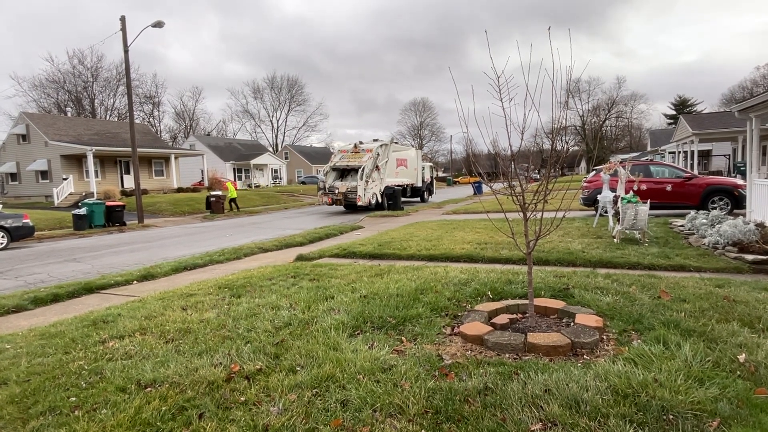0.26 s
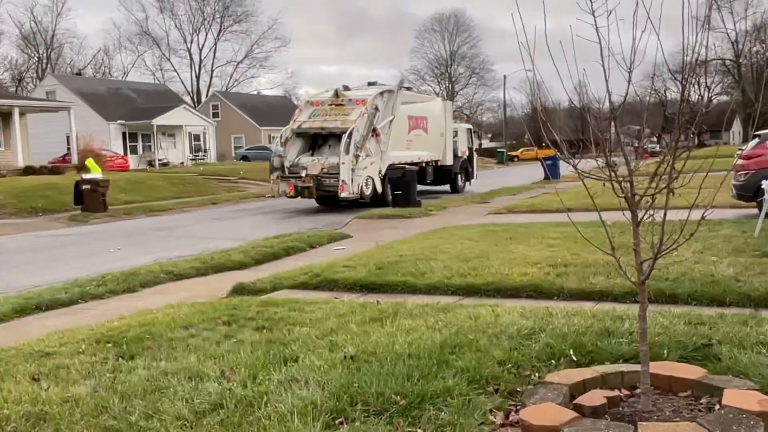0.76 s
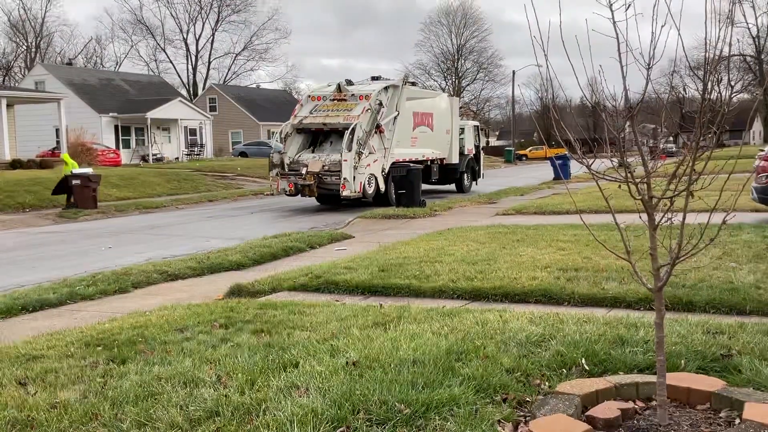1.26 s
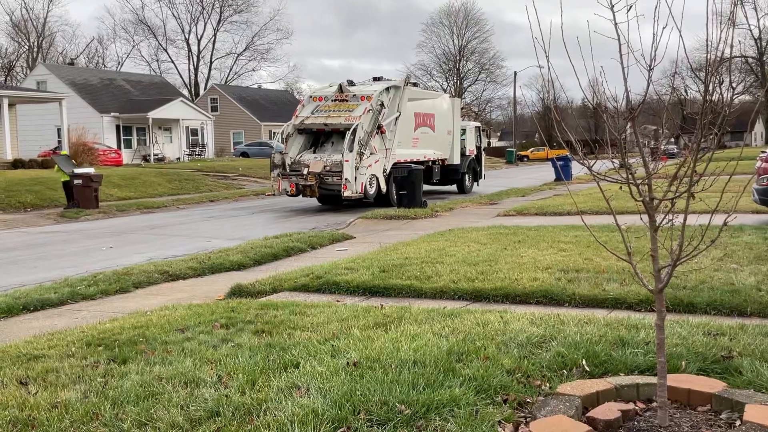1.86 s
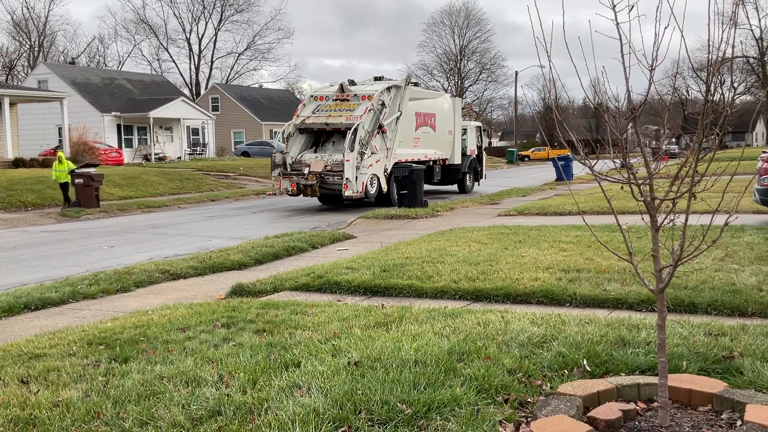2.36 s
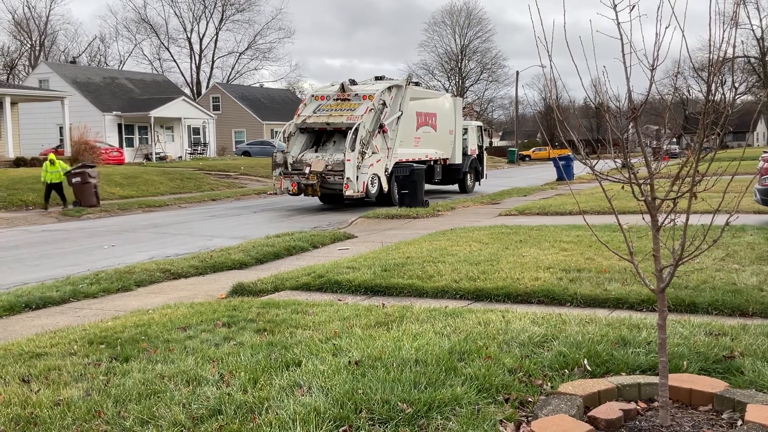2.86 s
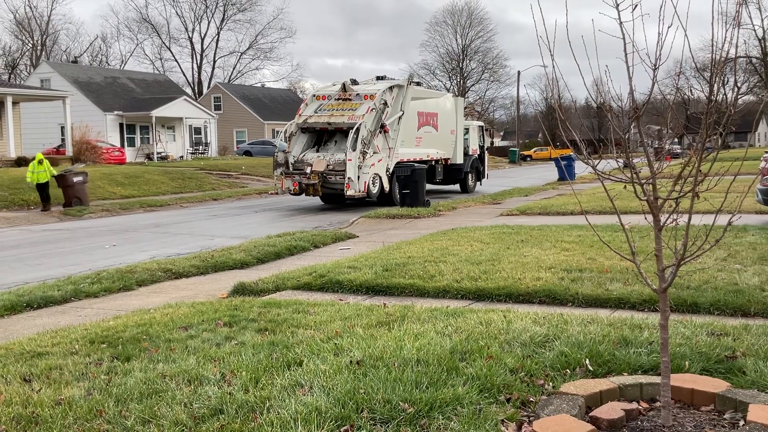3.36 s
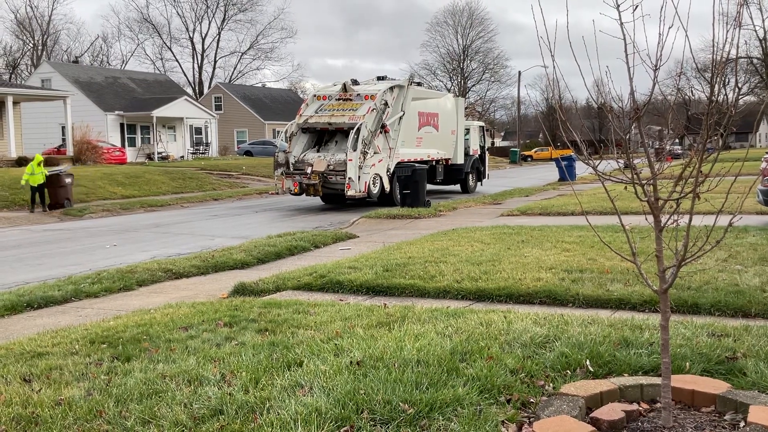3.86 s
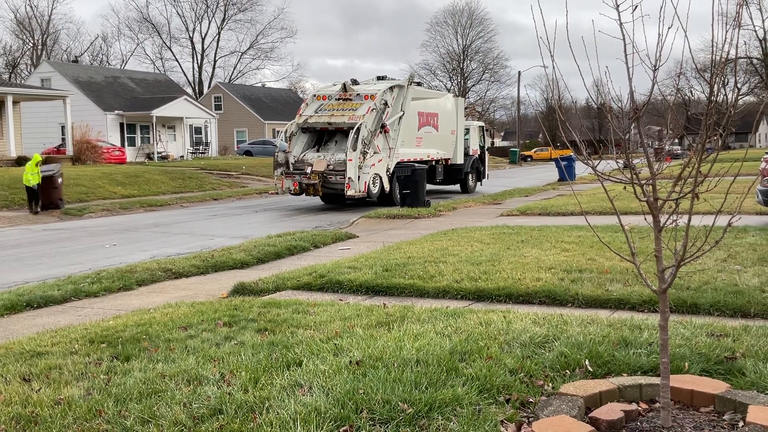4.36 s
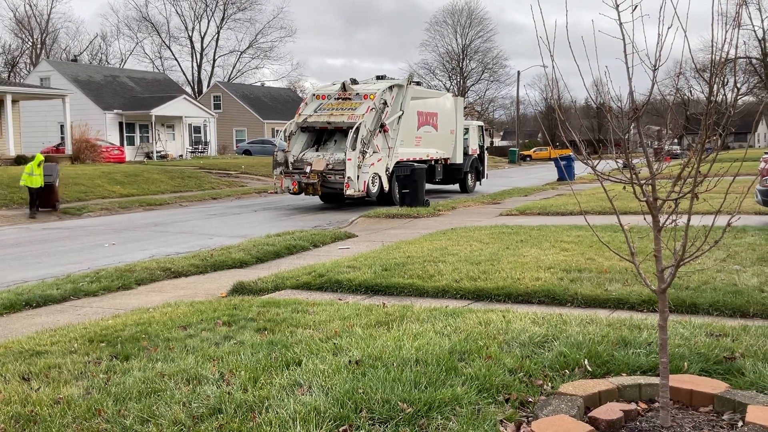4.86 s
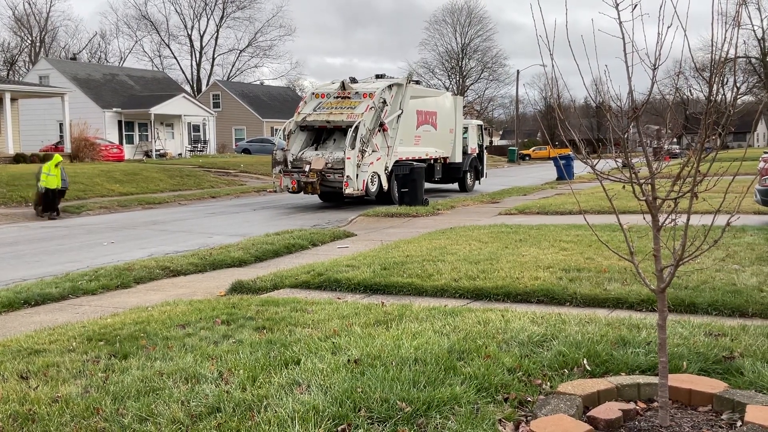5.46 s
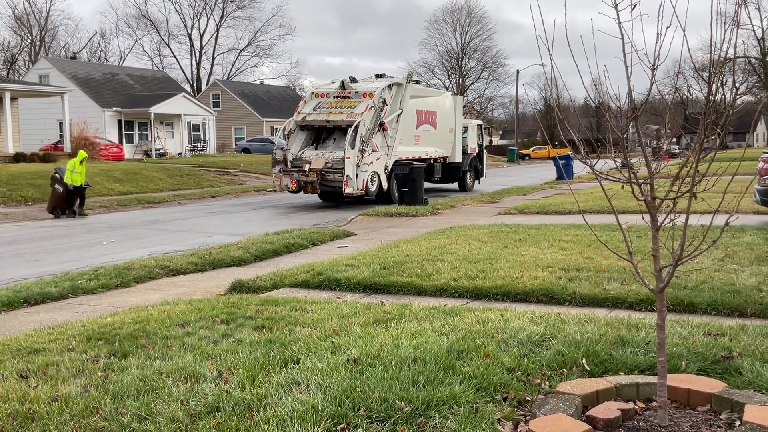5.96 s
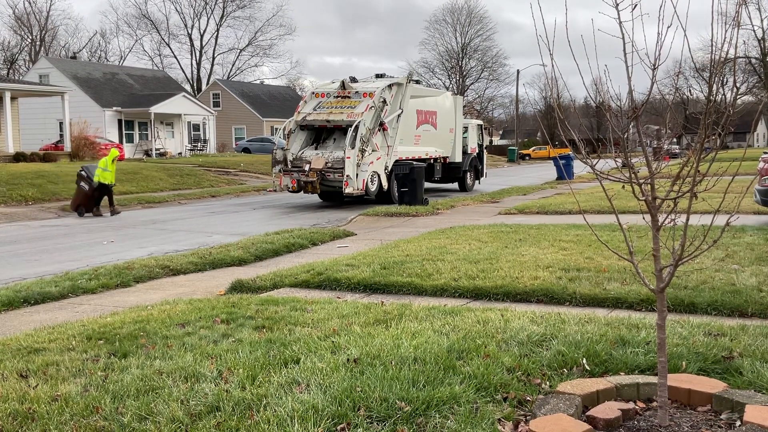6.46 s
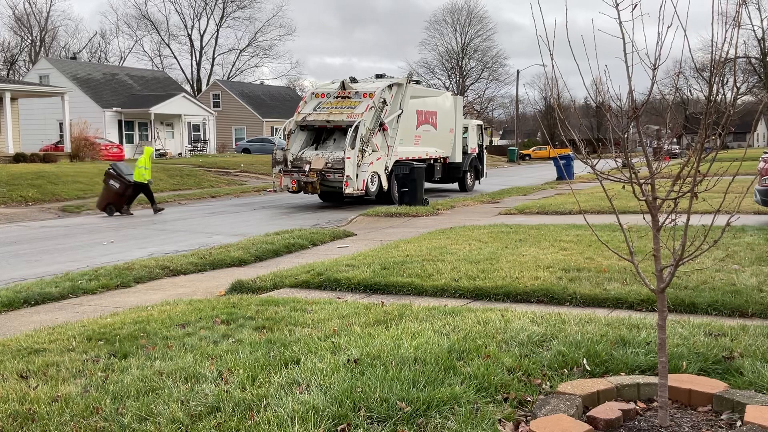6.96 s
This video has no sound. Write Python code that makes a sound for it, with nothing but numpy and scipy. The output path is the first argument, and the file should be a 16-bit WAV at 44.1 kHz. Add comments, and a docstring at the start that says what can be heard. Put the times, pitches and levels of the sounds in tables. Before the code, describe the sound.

Outdoors on a quiet residential street, a garbage truck's diesel idles throughout with low pulsing rumble, pump hum, metallic clatter, hiss and fading thin whines. After about three seconds a hollow plastic wheelie bin knocks and rattles over grass, goes nearly quiet, then bangs off the kerb and rolls over gritty asphalt with booming lurches and sharp stone snaps. Stereo microphone, light open-air scatter.

```python
"""A residential street: a garbage truck idles across the whole scene, heard at two microphone ports.
Engine and pump tones, firing-pulsed noise, a ringing hiss and thin whines make up the truck.
Nearby a plastic wheelie bin bumps over the verge and rolls along the asphalt. Filtered random contacts
make its hollow body boom, its walls rattle and grit crunch; timed bursts make knocks, a lid slap and snaps."""
import sys
import numpy as np
from scipy import signal
from scipy.fft import rfft, irfft, next_fast_len
from scipy.io import wavfile
from scipy.ndimage import uniform_filter1d

SR = 44100
rng = np.random.default_rng(int(sys.argv[2]) if len(sys.argv) > 2 else 0)


def unload_wav(signal):
    """Save mono or channel-first audio to the path in sys.argv[1] as 16-bit WAV at rate SR, clipped to [-1, 1]."""
    wavfile.write(
        sys.argv[1],
        SR,
        np.round(np.clip(np.atleast_2d(signal).T, -1, 1) * 32767).astype(np.int16),
    )


N = 317079
TIME = np.arange(N) / SR  # seconds

CRANK_HZ, PUMP_HZ = 13.34, 119.1  # mean turning rates
CLATTER_DB = -48  # rms
SQUEAL_HZ = 4320
# Engine tones. Each row: multiple of the crank rate (halves are rounded when played), mean level in dB rms.
ENGINE_ORDERS = [(4, -47), (5.5, -51.5), (6, -44), (7.5, -54.5), (8, -50.5), (11, -52), (12, -51.5),
                 (16, -59.5), (17, -61.5), (19, -61.5), (20, -63.5), (26, -69), (28, -58), (30, -62),
                 (37, -70), (64, -67.5), (72, -64)]
# Pump tones. Each row: multiple of the pump rate, level in dB before the pump hum's own curve.
PUMP_ORDERS = [(1, -38.5), (2, -42), (3, -54), (4, -66.5)]
# How the truck changes. Each row: time in seconds, then the gains of pump hum, hiss and whine in dB.
TRUCK_LEVELS = [(0, -1.5, 3, 5), (0.3, 0.5, 1, 4), (0.8, -3.5, 1.5, 3), (1.3, -2, 0.5, 1.5),
                (1.7, -2.5, 0.5, -1), (2.3, -1, 0, -0.5), (2.85, -2, -1.5, -1.5), (3.8, -2.5, -3, -7),
                (5.2, -2.5, -4, -10.5), (7.19, 1, -4, -9.5)]
# Exhaust rumble spectrum. Each row: frequency in Hz, relative level in dB.
RUMBLE_SPECTRUM = [(20, -71), (36, -17), (52, 0), (85, 3), (130, -1.5), (180, -1), (250, -11.5),
                   (300, -13.5), (450, -21.5), (800, -56)]
# Engine block clatter spectrum. Each row: frequency in Hz, relative level in dB.
CLATTER_SPECTRUM = [(250, -25), (480, 2), (680, 3.5), (900, 3), (1280, -1.5), (1650, 0.5), (1830, 6),
                    (2050, -4), (2600, -6), (3500, -6), (6000, -47.5), (11000, -61.5)]
# Ringing hiss spectrum. Each row: frequency in Hz, relative level in dB.
HISS_SPECTRUM = [(1800, -6.5), (2700, 7), (3300, -9.5), (3850, -1.5), (4200, 3.5), (4450, -2), (5200, 0.5),
                 (5800, 1), (6050, -3), (6300, 0.5), (6600, -3), (6900, 3), (7450, -1), (7700, -4.5),
                 (7900, -1), (8200, -9), (8450, -6), (8700, -8.5), (10100, -9.5), (11000, -16),
                 (12500, -59)]
# Thin whines of the running machinery. Each row: frequency in Hz, relative level in dB.
WHINES = [(1828, -61.5), (4635, -70), (4770, -68), (5109, -73), (5211, -75.5), (5286, -73.5), (6282, -71),
          (6465, -74), (6840, -66.5), (7000, -66), (7090, -68.5), (7381, -71), (7430, -68), (7860, -76)]
# One thin squeal with its own swell and fade. Each row: time in seconds, level in dB.
SQUEAL_LEVELS = [(0, -75), (1.0, -64.5), (1.8, -64), (2.2, -61.5), (2.7, -65.5), (3.3, -72), (5.0, -71)]

# The bin is hauled over the lawn, rests, then rolls off the kerb on to the road.
# Each row: time in seconds, relative body boom in dB, relative wall rattle in dB.
ROLL = [(3.25, -36, -49.5), (3.56, -26, -36.5), (3.74, -31, -39.5), (3.81, -34, -44), (3.9, -31.5, -36.5),
        (4.1, -39, -45.5), (4.9, -41.5, -62), (5.25, -23, -45), (5.65, -24, -43), (6.08, -28.5, -43),
        (6.6, -27, -51.5), (6.95, -26, -42.5), (7.19, -30.5, -49)]
# Once it rolls freely the bin lurches on every turn of its wheels.
ROLLING_S, FIRST_LURCH_S, WHEEL_TURN_S = 4.8, 5.275, 0.234
LURCH_BOOM_DB, LURCH_RATTLE_DB = 2, 3  # swing either way
# Ground under the wheels. Each row: start in seconds, crunch level in dB, gain above 7 kHz in dB.
GROUND = [(3.3, -65, 15), (4.4, -63, -1), (5.2, -57, -31), (5.6, -51, 4.5), (6.07, -57.5, 6.5),
          (6.33, -59.5, 6.5), (6.8, -58.5, 9)]
GROUND_BLEND_S = 0.015
STONES_PER_S, STONES_DB = 70, 0.5  # random cracks, level against the grit
CRUNCH_TOP_HZ = 10200
# Hollow body of the bin. Each row: frequency in Hz, relative level in dB.
BODY_SPECTRUM = [(28, -63), (45, -17), (65, -2.5), (90, -4.5), (112, -0.5), (138, 4), (168, -12),
                 (205, -5.5), (260, -15.5), (340, -17.5), (480, -32), (900, -63.5), (4000, -110)]
# Plastic walls of the bin. Each row: frequency in Hz, relative level in dB.
WALL_SPECTRUM = [(90, -24), (250, 17.5), (480, 5.5), (700, 3), (1000, 5), (1280, -0.5), (1520, 0.5),
                 (1750, -19.5), (2400, -6.5), (3400, -17), (7000, -37), (11000, -70)]
# Grit and plastic cracking. Each row: frequency in Hz, relative level in dB.
GRIT_SPECTRUM = [(1000, -22), (2200, 1.5), (2800, 2.5), (3300, 0.5), (4500, -1), (5050, -1), (5550, -6),
                 (6000, -2.5), (6400, -7), (7000, -6.5), (8200, -13), (9900, -14.5), (12000, -21),
                 (13200, -35), (16000, -41)]
# Modes of the plastic walls. Each row: frequency in Hz, relative level in dB.
WALL_MODES = [(620, -8), (1010, -8), (1170, -6.5), (1500, -3), (2720, -11), (3300, 0)]

# Hard knocks of wheels, axle and lid.
# Each row: start in seconds, relative clack peak in dB, wall ring in Hz, body ring in Hz, relative thud peak in dB.
KNOCKS = [(2.456, -36, 617, 130, -28), (3.323, -29.5, 420, 129, -30), (3.359, -33, 410, 236, -26),
          (3.384, -29, 545, 125, -21.5), (3.403, -37, 452, 109, -20.5), (3.446, -27, 460, 183, -28),
          (3.466, -39, 487, 110, -35), (3.503, -21.5, 1450, 113, -36), (3.529, -26, 1430, 127, -26),
          (3.554, -23.5, 724, 107, -26), (3.567, -24, 746, 143, -22), (3.581, -28.5, 1300, 127, -23.5),
          (3.599, -35, 915, 92, -19), (3.619, -26.5, 436, 139, -25.5), (3.637, -25, 564, 139, -33),
          (3.681, -32, 528, 100, -25), (3.714, -32, 600, 234, -29), (3.727, -22.5, 830, 117, -25),
          (3.749, -27, 427, 110, -33), (3.865, -33, 806, 117, -33), (3.882, -21, 1450, 248, -30),
          (3.904, -26, 1360, 96, -19.5), (3.930, -27.5, 820, 183, -26.5), (3.957, -29.5, 842, 139, -36),
          (4.019, -27.5, 820, 131, -47), (4.039, -38, 418, 161, -34), (4.169, -28, 1040, 106, -24),
          (4.256, -33.5, 800, 128, -36), (4.972, -21, 970, 155, -23.5), (5.06, -22.5, 457, 175, -19.5),
          (5.077, -27, 1040, 108, -21), (5.175, -26, 484, 140, -40), (5.215, -28, 430, 140, -14.5),
          (5.256, -20, 446, 129, -18.5), (5.289, -21.5, 696, 222, -34), (5.343, -23.5, 960, 109, -26),
          (5.382, -24.5, 470, 116, -21.5), (5.423, -24, 527, 151, -27), (5.437, -36, 500, 120, -17),
          (5.456, -25.5, 420, 252, -21), (5.473, -25, 1080, 161, -26), (5.498, -21.5, 476, 217, -19),
          (5.519, -24, 546, 134, -23), (5.545, -21, 816, 124, -16.5), (5.573, -18.5, 470, 139, -16.5),
          (5.619, -21.5, 1510, 122, -21), (5.644, -29, 980, 113, -23), (5.710, -20, 450, 204, -15.5),
          (5.734, -29, 479, 210, -16), (5.753, -31, 416, 233, -18.5), (5.772, -31, 420, 136, -15.5),
          (5.870, -30, 960, 155, -31), (5.896, -25.5, 1400, 123, -22), (5.909, -26, 420, 138, -28),
          (5.982, -22, 960, 104, -23), (6.008, -33, 1400, 122, -17), (6.056, -23.5, 506, 129, -25),
          (6.161, -24.5, 533, 107, -15.5), (6.186, -33, 452, 97, -27), (6.224, -32, 1190, 128, -29),
          (6.318, -32, 1270, 99, -31), (6.442, -32.5, 800, 117, -12), (6.627, -35, 1040, 208, -22),
          (6.845, -31.5, 493, 113, -20), (6.880, -27, 497, 118, -19.5), (6.934, -36, 939, 145, -37),
          (6.963, -23, 505, 104, -14), (7.160, -31, 840, 118, -29)]
REBOUNDS_PER_S = 3000  # loose parts chatter after each blow
LAWN_CHATTER_S, ROAD_CHATTER_S = 0.0098, 0.0062  # chatter decays; longer over the lawn
# Modes of the lid. Each row: frequency in Hz, relative level in dB, time to fall 60 dB in seconds.
LID_MODES = [(301, -17, 0.047), (1025, -28.5, 0.072), (1502, -21.5, 0.047), (2720, -36, 0.062),
             (3520, -37, 0.035)]
LID_S, LID_DB = 5.2885, -16  # start, peak level
# Loud snaps of grit and plastic.
# Each row: start in seconds, relative peak in dB, ring in Hz, gain above 7 kHz in dB.
SNAPS = [(1.512, -22.5, 4170, -1.5), (3.322, -25.5, 3630, 15), (3.5038, -31, 3000, 15),
         (3.683, -30.5, 3120, 2), (3.7638, -16.5, 3140, 5), (3.819, -24, 3250, 9), (4.167, -36, 4040, 13),
         (4.282, -34.5, 3300, -3), (4.3943, -34, 3260, 12), (4.843, -32, 2800, 5), (5.249, -26, 3280, -14),
         (5.2872, -26.5, 3120, 1), (5.621, -34, 3500, -5), (5.728, -28, 2960, -14),
         (5.5796, -21, 3580, -10), (5.634, -35, 5500, 4), (5.674, -26.5, 3300, 11), (5.739, -15, 3430, 11),
         (5.762, -18, 3450, 14), (5.843, -28.5, 3290, 16), (5.855, -31, 4210, 8), (5.899, -36, 4610, 3),
         (5.9826, -10, 5700, 9.5), (6.013, -29, 7000, 7), (6.1388, -22, 3370, 3), (6.1953, -26, 6100, 12),
         (6.2208, -30.5, 3330, 6), (6.274, -32, 5300, 7), (6.453, -25, 3100, 17), (6.491, -31, 3480, 9),
         (6.5002, -22.5, 3330, 10.5), (6.532, -44, 4400, 13), (6.6406, -29, 3070, -5),
         (6.6803, -20.5, 3050, 14), (6.751, -36.5, 3340, 2), (6.769, -35, 4600, 11), (6.806, -35, 3120, 18),
         (6.872, -35, 3120, 13), (6.84, -28, 4770, 20), (6.892, -31, 3150, 8), (6.9325, -23, 3120, 15),
         (6.956, -35.5, 4500, 12), (7.034, -32, 6000, 2), (7.0494, -36, 3170, -0.5),
         (7.145, -32.5, 4400, 8), (7.16, -29, 3130, 4)]
SLIP_DECAY_S, CRACK_DECAY_S = 0.0045, 0.0014
CRUMBS_PER_S, CRUMBS_DB, CRUMB_DECAY_S = 2500, -10.5, 0.02

# Phase between the ports for the truck's direction. Each row: frequency in Hz, lead of the left port in radians.
TRUCK_PHASE = [(0, 0), (600, -0.9), (860, -0.5), (1210, -0.5), (2070, 2.6), (2580, 3.4), (3100, 5.6),
               (3530, 6.1), (6030, 6.7), (7840, 7.3), (8100, 7.3), (10300, 8.2), (11100, 9.3), (12700, 9.5)]
# Phase between the ports for the bin's direction. Each row: frequency in Hz, lead of the left port in radians.
BIN_PHASE = [(0, 0), (430, 0.1), (690, -0.4), (1290, -0.1), (2070, 2.7), (2580, 3.5), (3100, 5.6),
             (3530, 6.2), (8350, 7.4), (9910, 7.9), (10900, 8.6), (12700, 8.9)]
# Colour of the right port against the left. Each row: frequency in Hz, gain in dB.
RIGHT_PORT = [(100, 0.2), (300, 0.6), (700, 1.1), (1700, 1.0), (2600, -0.2), (5000, -0.5), (8000, 0)]
SCATTER_DB = -7.5  # street scatter before its low-pass and high-pass
CUTOFF_HZ = 16000


def from_db(db):
    """Decibels to gain."""
    return 10 ** (np.asarray(db) / 20)


def rms_one(x):
    """Scale to unit rms."""
    return x / np.sqrt(np.mean(x ** 2) + 1e-20)


def in_time(rows):
    """One curve over time for each level column of a table."""
    s, *columns = np.transpose(rows)
    return [np.interp(TIME, s, column) for column in columns]


def drift(rate_hz):
    """Slow random wander of unit rms: noise through a double pole at the given rate."""
    step = 40  # samples between points of the wander
    r = np.exp(-2 * np.pi * rate_hz * step / SR)
    noise = rng.standard_normal(N // step + 4002)
    slow = signal.lfilter([1], [1, -2 * r, r * r], noise)[4000:]  # skip the filter's start
    return np.interp(np.arange(N) / step, np.arange(len(slow)), rms_one(slow))


def colour(x, spectrum):
    """Causal (minimum-phase) filter with the given spectrum, built by folding its cepstrum."""
    length = x.shape[-1]
    size = 2 * next_fast_len(length // 2 + SR // 8)
    hz, db = np.transpose(spectrum)
    grid = np.maximum(np.fft.rfftfreq(size, 1 / SR), 1)
    gain = from_db(np.interp(np.log(grid), np.log(hz), db))
    cepstrum = irfft(np.log(gain))
    cepstrum[1:size // 2] *= 2
    cepstrum[size // 2 + 1:] = 0
    response = np.exp(rfft(cepstrum))
    return irfft(rfft(x, size) * response)[..., :length]


def resonance(x, hz, width_hz):
    """Two-pole resonance with a gain of about 1 at its peak."""
    r = np.exp(-np.pi * width_hz / SR)
    feed = np.array([1, 0, -1]) * (1 - r * r) / 2
    return signal.lfilter(feed, [1, -2 * r * np.cos(2 * np.pi * hz / SR), r * r], x)


def treble_shelf(x, gain_db):
    """Crossover at 7 kHz with its upper half raised or lowered: harder contacts have more top."""
    low = np.tile(signal.butter(2, 7000, "low", fs=SR, output="sos"), (2, 1))
    high = np.tile(signal.butter(2, 7000, "high", fs=SR, output="sos"), (2, 1))
    return signal.sosfilt(low, x) + from_db(gain_db) * signal.sosfilt(high, x)


def soften(x):
    """Steep low-pass that takes the airy top off small contacts."""
    return signal.sosfilt(signal.butter(14, CRUNCH_TOP_HZ, fs=SR, output="sos"), x)


def grains(per_s, spread_db):
    """Random contacts of uneven size and either sign."""
    sizes = from_db(spread_db * np.minimum(rng.exponential(1, N), 3)) * rng.choice([-1, 1], N)
    return sizes * (rng.random(N) < per_s / SR)


def place(times, peaks_db, sounds):
    """Lay short sounds on the time line, each at its own peak level."""
    out = np.zeros(N + SR)
    for s, db, sound in zip(times, peaks_db, sounds):
        out[int(s * SR):][:len(sound)] += from_db(db) * sound / np.abs(sound).max()
    return out[:N]


def at_ports(x, phase):
    """Direct sound differs in phase between the ports; each port has its own decaying street scatter."""
    size = 2 * next_fast_len(N // 2 + SR // 2)
    lead = np.interp(np.fft.rfftfreq(size, 1 / SR), *np.transpose(phase))
    direct = np.array([np.ones(len(lead)), np.exp(-1j * lead)])
    age = TIME[:SR // 2]
    # falls 60 dB in half a second after a soft onset
    scatter = rng.standard_normal((2, len(age))) * from_db(-60 * age / .5) * (1 - np.exp(-age / 0.0069))
    scatter = rms_one(scatter) / np.sqrt(len(age))
    scatter = signal.sosfilt(signal.butter(3, 290, "high", fs=SR, output="sos"), scatter)
    scatter = signal.sosfilt(signal.butter(1, 1800, fs=SR, output="sos"), scatter)
    paths = direct + from_db(SCATTER_DB) * rfft(scatter, size)
    return irfft(rfft(x, size) * paths)[:, :N]


def tones(turns, orders, waver_db):
    """Whole-number harmonics of a turning shaft, each wavering in level."""
    total = 0
    for order, db in orders:
        level = np.sqrt(2) * from_db(db + waver_db * drift(3.4))
        total = total + level * np.sin(2 * np.pi * (round(order) * turns + rng.random()))
    return total


def whistle(hz, firing):
    """A slightly wandering whistle inside a narrow band of ringing noise."""
    noise = rng.standard_normal(N) * (1 + firing)
    ring = resonance(resonance(noise, hz, width_hz=21), hz, width_hz=63)
    tone = np.sqrt(2) * np.sin(2 * np.pi * np.cumsum(hz + 7 * drift(15.5)) / SR)
    return 0.76 * rms_one(ring) + from_db(1.7 * drift(1.7) - 3.5) * tone


def block_clatter(crank, firing):
    """Noise of metal contacts, part of which repeats alike on every firing."""
    pattern = rng.standard_normal(SR // 30)
    alike = np.interp(2 * crank % 1 * len(pattern), np.arange(len(pattern)), pattern)
    contacts = (rng.standard_normal(N) + 0.5 * alike) * (1 + 0.25 * firing)
    return from_db(CLATTER_DB) * rms_one(colour(contacts, CLATTER_SPECTRUM))


def truck():
    """Firings, two a crank turn, pulse the rumble and clatter; the pump hums and the machinery whines."""
    pump_db, hiss_db, whine_db = in_time(TRUCK_LEVELS)
    # shaft turns so far, with a little unsteadiness
    crank = np.cumsum(CRANK_HZ * (1 + 0.001576 * drift(1.632))) / SR
    pump = np.cumsum(PUMP_HZ * (1 + 0.0011 * drift(2.97))) / SR
    firing = rms_one(np.exp(-(2 * crank % 1) / 0.09))
    engine_hum = tones(crank, ENGINE_ORDERS, waver_db=3.0)
    pump_hum = from_db(pump_db) * tones(pump, PUMP_ORDERS, waver_db=1.6)
    rumble = colour(rng.standard_normal(N) * (1 + 0.85 * firing), RUMBLE_SPECTRUM)
    rumble = from_db(-42.5) * rms_one(rumble)
    clatter = block_clatter(crank, firing)
    hiss = colour(rng.standard_normal(N) * (1 + 0.12 * firing), HISS_SPECTRUM)
    hiss = from_db(hiss_db - 53.7 + 0.5 * drift(1.13)) * rms_one(hiss)
    whine = from_db(whine_db) * sum(from_db(db) * whistle(hz, firing) for hz, db in WHINES)
    squeal = from_db(in_time(SQUEAL_LEVELS)[0]) * whistle(SQUEAL_HZ, firing)
    return engine_hum + pump_hum + rumble + clatter + hiss + whine + squeal


def underfoot():
    """Crunch and treble of each stretch of ground, blended as the wheels cross over."""
    starts, *columns = np.transpose(GROUND)
    stretch = np.maximum(np.searchsorted(starts, TIME) - 1, 0)
    return [uniform_filter1d(column[stretch], size=int(GROUND_BLEND_S * SR)) for column in columns]


def stones():
    """Small stones crack at random: short noise bursts that ring at one of nine pitches; unit rms."""
    cracks = 0
    for hz in np.geomspace(3100, 8500, num=9):
        hits = np.abs(grains(per_s=STONES_PER_S / 9, spread_db=1.5))
        envelope = signal.lfilter([1], [1, -np.exp(-1 / (0.002 * SR))], hits + 1e-18)  # 2 ms decay
        burst = envelope * rng.standard_normal(N)
        cracks = cracks + 0.32 * burst + resonance(burst, hz, width_hz=1100)
    return rms_one(colour(soften(cracks), GRIT_SPECTRUM))


def ground_crunch():
    """Grains crushed in clumps and cracking stones, at the level and brightness of the ground."""
    crunch_db, treble_db = underfoot()
    grit = soften(grains(per_s=3000, spread_db=4.0)) * from_db(1.7 * drift(53))
    grit = rms_one(colour(grit, GRIT_SPECTRUM))
    return from_db(crunch_db) * treble_shelf(grit + from_db(STONES_DB) * stones(), treble_db)


def wall_rattle():
    """Small contacts, each of which sets one wall mode ringing."""
    total = 0
    for hz, db in WALL_MODES:
        contacts = grains(per_s=75, spread_db=3.0)
        total = total + contacts + from_db(db + 11.5) * resonance(contacts, hz, width_hz=75)
    return total


def wheelie_bin():
    """Rough ground shakes the hollow body and walls, hardest once on each turn of the wheels."""
    boom_db, rattle_db = in_time(ROLL)
    moving = np.clip((TIME - 3.2) / 0.13, 0, 1)
    lurch = (TIME > ROLLING_S) * np.cos(2 * np.pi * (TIME - FIRST_LURCH_S) / WHEEL_TURN_S)
    shake = colour(grains(per_s=450, spread_db=-1.0), BODY_SPECTRUM)
    # levelled, so the ground and not chance sets the slow swells
    swell = np.sqrt(uniform_filter1d(shake ** 2, size=SR // 25) + 1e-12)
    boom = from_db(boom_db + LURCH_BOOM_DB * lurch - 2.0) * shake / swell
    rattle = rms_one(colour(wall_rattle(), WALL_SPECTRUM))
    rattle = from_db(rattle_db + LURCH_RATTLE_DB * lurch - 0.05) * rattle
    return moving * (boom + rattle + ground_crunch())


def blows(rings_hz, width_hz, ring_db, chatter, decay_s, spectrum):
    """Each blow is a push and a dying chatter of contacts that favours one mode of a body."""
    age = TIME[:SR // 7]
    shape = (len(rings_hz), len(age))
    contacts = rng.standard_normal(shape) * (rng.random(shape) < REBOUNDS_PER_S / SR)
    force = chatter * contacts * np.exp(-age / decay_s) * (1 - np.exp(-age / 0.0012))
    force[:, 0] += 1  # the push
    rings = np.array([resonance(f, hz, width_hz) for f, hz in zip(force, rings_hz)])
    return colour(force + from_db(ring_db) * rings, spectrum)


def wall_ring(clacks):
    """Every blow lands elsewhere and sets the wall modes ringing in a mix of its own."""
    strengths = rng.standard_normal((len(clacks), len(WALL_MODES)))
    rings = 0
    for k, (hz, db) in enumerate(WALL_MODES):
        rings = rings + from_db(db) * strengths[:, [k]] * resonance(clacks, hz, width_hz=85)
    return clacks + rings


def knocks():
    """A bump clacks the walls and thuds in the hollow body."""
    s, clack_db, wall_hz, body_hz, thud_db = np.transpose(KNOCKS)
    chatter_s = np.where(s < ROLLING_S, LAWN_CHATTER_S, ROAD_CHATTER_S)[:, None]
    clacks = blows(wall_hz, width_hz=116, ring_db=5.0, chatter=0.67, decay_s=chatter_s,
                   spectrum=WALL_SPECTRUM)
    thuds = blows(body_hz, width_hz=29, ring_db=17.0, chatter=0.072, decay_s=0.016,
                  spectrum=BODY_SPECTRUM)
    return place(s, clack_db + 0.5, wall_ring(clacks)) + place(s, thud_db - 3.0, thuds)


def lid():
    """The lid drops shut: its decaying modes swell in from a soft slap."""
    age = TIME[:SR // 5]
    ring = 0
    for hz, db, t60 in LID_MODES:
        ring = ring + from_db(db - 60 * age / t60) * np.sin(2 * np.pi * (hz * age + rng.random()))
    return place([LID_S], [LID_DB], [ring * (1 - np.exp(-(age / 0.003) ** 2))])


def snaps():
    """A stone slips, breaks a moment later and sheds crumbs; each has its own brightness and ring."""
    s, peak_db, rings_hz, treble_db = np.transpose(SNAPS)
    age = TIME[:SR // 15]
    since_break = age - rng.uniform(0.000552, 0.0024, (len(s), 1))
    slip = 0.5 * (1 - np.exp(-age / 0.00079)) * np.exp(-age / SLIP_DECAY_S)
    breaking = (since_break > 0) * np.exp(-np.abs(since_break) / CRACK_DECAY_S)
    noise = rng.standard_normal((len(s), len(age)))
    cracks = noise * (slip + breaking)
    rings = np.array([resonance(crack, hz, width_hz=350) for crack, hz in zip(cracks, rings_hz)])
    crumbs = noise * (rng.random(noise.shape) < CRUMBS_PER_S / SR) * np.exp(-age / CRUMB_DECAY_S)
    snap = cracks + 2.0 * rings + from_db(CRUMBS_DB) * soften(crumbs)
    snap = treble_shelf(snap, treble_db[:, None])
    return place(s, peak_db + 1.5, colour(snap, GRIT_SPECTRUM))


def scene():
    """Truck and bin stand in different directions from the microphone, with equal scatter."""
    bin_sounds = wheelie_bin() + knocks() + lid() + snaps()
    return at_ports(truck(), TRUCK_PHASE) + at_ports(bin_sounds, BIN_PHASE)


def record(dry):
    """The two microphone ports differ a little in colour; the top is cut."""
    ports = np.array([dry[0], colour(dry[1], RIGHT_PORT)])
    return signal.sosfilt(signal.cheby2(12, 70, CUTOFF_HZ, fs=SR, output="sos"), ports)


dry = scene()
out = record(dry)
unload_wav(out)
```